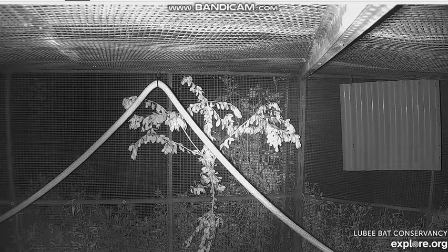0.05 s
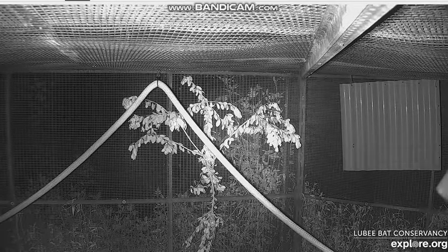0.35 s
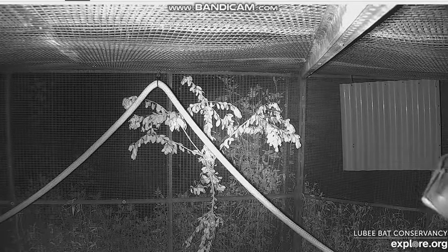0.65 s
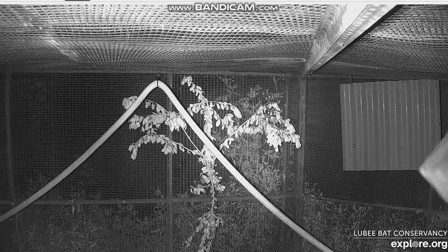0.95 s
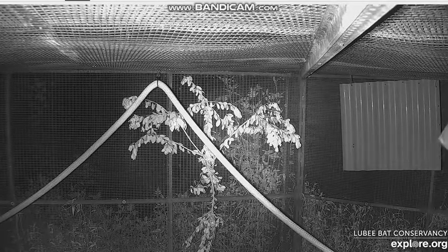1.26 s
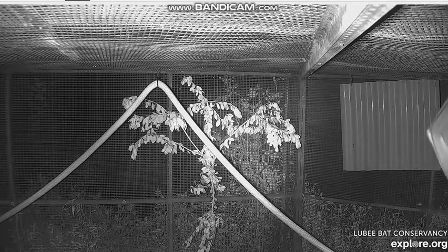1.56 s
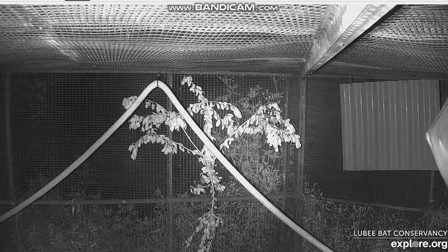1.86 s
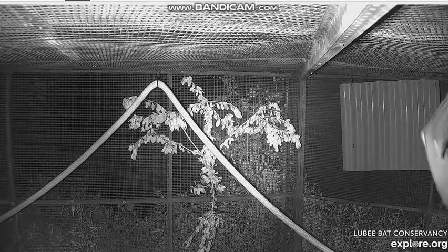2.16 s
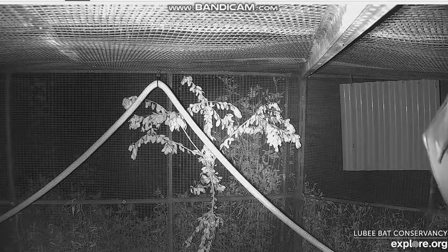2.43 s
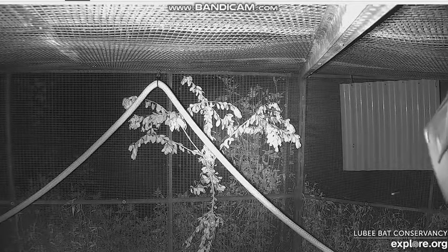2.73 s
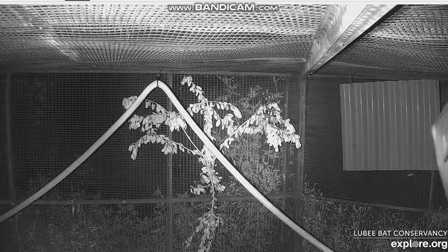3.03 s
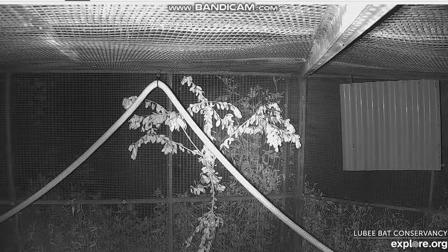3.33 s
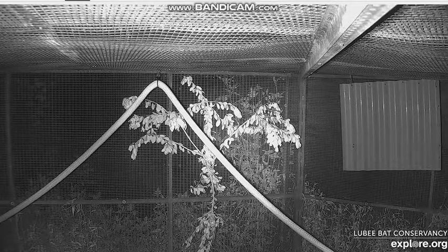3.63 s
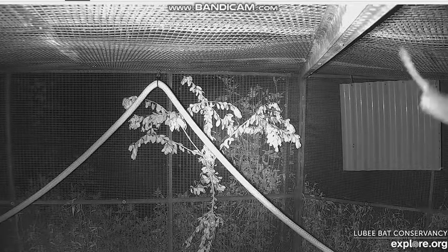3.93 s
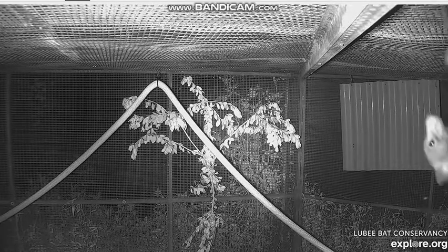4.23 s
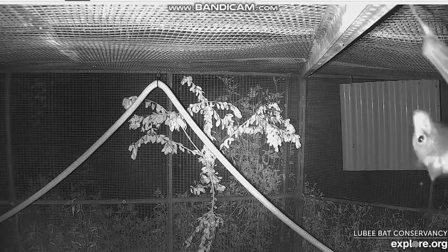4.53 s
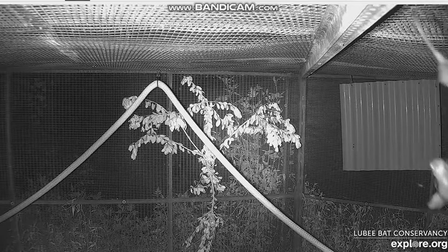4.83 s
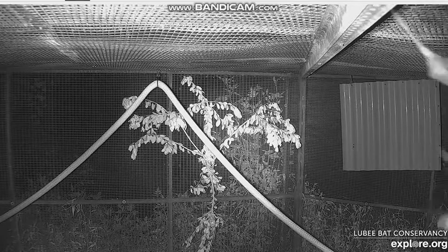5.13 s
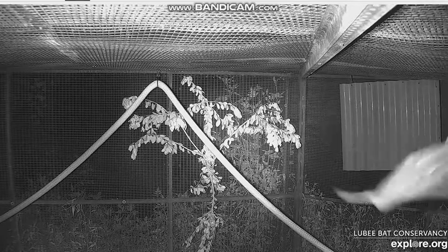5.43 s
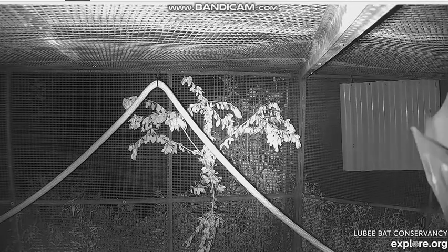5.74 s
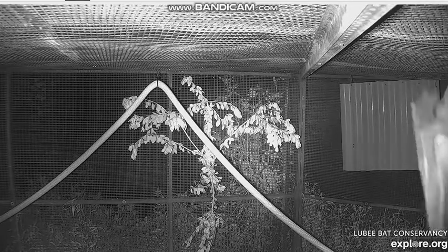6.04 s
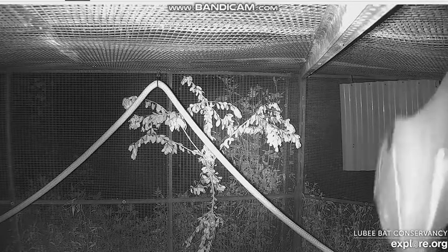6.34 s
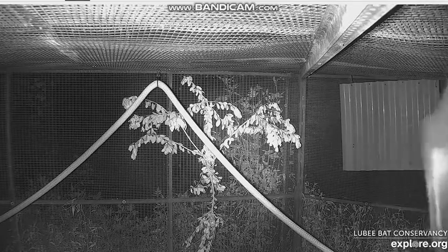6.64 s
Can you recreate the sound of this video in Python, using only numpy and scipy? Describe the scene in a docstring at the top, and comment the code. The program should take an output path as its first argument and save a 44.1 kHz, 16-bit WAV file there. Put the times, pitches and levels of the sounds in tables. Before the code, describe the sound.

Night insects make a faint, steady high hiss over a low machine hum in a roofed mesh enclosure. A fruit bat gives two squeals that run into a quick, uneven series of raspy squawks. After a pause comes one very short, harsh screech, the loudest sound. Claws and wings rustle softly on the mesh now and then, more often toward the end. The calls have a short echo.

```python
"""Fruit bat in a mesh enclosure

A fruit bat squawks a quick series of calls, then one short harsh screech. Its vocal folds slip between
clean tone, period doubling and rasp, filtered by the throat; the roofed enclosure adds a short tail.
Bats rustle faintly on the mesh, over a low machine hum and the steady high hiss of night insects."""
import sys
import numpy as np
from scipy import signal
from scipy.fft import rfft, irfft, next_fast_len
from scipy.io import wavfile
from scipy.ndimage import uniform_filter1d

SR = 44100
rng = np.random.default_rng(int(sys.argv[2]) if len(sys.argv) > 2 else 0)


def generate_wav(sig):
    """Save sig (samples, or channels by samples) to the path in sys.argv[1] as 16-bit PCM at SR."""
    pcm = np.round(np.clip(np.atleast_2d(sig).T, -1, 1) * 32767).astype(np.int16)
    wavfile.write(sys.argv[1], SR, pcm)


N = 294367
TIME = np.arange(N) / SR
BAND_LIMIT_HZ = 14000

# machine hum partials: frequency_hz, level_db
HUM_PARTIALS = [(62.5, -104), (75.5, -68.5), (93.5, -73.5), (120, -71), (125, -75), (187.5, -78),
                (240, -78.5)]
# spectral envelopes of the noise sources: frequency_hz, relative_db
RUMBLE_SPECTRUM = [(12, -50), (20, -18), (48, -34), (52, -18), (64, -9), (97, -7.5), (123, 4), (151, -2.5),
                   (315, -13), (676, -28), (900, -31), (1170, -60), (1980, -120)]
PUFF_SPECTRUM = [(350, -40), (680, 6), (900, 1), (1200, -6), (1900, -2), (3000, -32), (9000, -40)]
RUSH_SPECTRUM = [(100, -9), (280, 2), (450, -6), (800, -23), (2000, -33), (8000, -75)]
HISS_SPECTRUM = [(300, -10.5), (1000, -10), (1500, -5), (1900, -3), (4000, 0.5), (5600, -10), (7700, -10),
                 (9500, -3), (11000, -1), (12100, -4), (12500, -17), (14000, -25)]
KATYDID_SPECTRUM = [(6500, -44), (8000, -16.5), (9500, 2.5), (10900, 3.5), (11500, 0.5), (12100, -2.5),
                    (12500, -13), (14000, -34)]
SCUFF_SPECTRUM = [(600, -28), (1050, -10), (1350, -13.5), (1600, -13.5), (2500, -3.5), (3500, 4), (4300, 2),
                  (5500, -5.5), (8000, -15.5), (13000, -25)]
# soft low puffs: peak_s, level_db
PUFFS = [(1.45, -69), (1.81, -70.5), (2.14, -67.5), (3.76, -69), (5.03, -64)]
# envelope of a distant rush: time_s, level_db
RUSH_ENVELOPE = [(0, -71.5), (.5, -69.5), (1.0, -80), (1.6, -84), (2.5, -78), (6.7, -87)]
# katydid buzzes: stroke_rate_hz, level_db
KATYDIDS = [(100.2, -80), (109.6, -71.5), (114.5, -75)]
# cricket trills: centre_hz, bandwidth_hz, level_db
CRICKETS = [(6628, 310, -66), (6274, 280, -73.5)]
# claws and wings on the mesh: start_s, level_db, fade_s
SCUFFS = [(.195, -63.5, 0.044), (.3, -71.5, 0.16), (0.542, -52, 0.0028), (.68, -70, 0.054),
          (.77, -62.5, 0.044), (1.18, -62.5, 0.095), (1.33, -67, .04), (1.5, -68, 0.036),
          (3.818, -58, 0.08), (4.13, -68, 0.17), (4.66, -62.5, 0.087), (4.8, -61.5, 0.041),
          (5.11, -60, 0.059), (5.335, -67.5, 0.08), (5.47, -65, 0.1), (5.61, -64, 0.047),
          (5.794, -58.5, 0.054), (5.885, -60, .08), (5.975, -56.5, 0.053), (6.44, -65.5, 0.084),
          (6.53, -64, 0.09), (6.643, -56, .08)]
# resonances of the mesh: centre_hz, bandwidth_hz, relative_db
MESH_MODES = [(1340, 155, -18), (1790, 92, -14), (3450, 93, -22.5), (4000, 30, -12.5)]
# single ringing wires: peak_s, centre_hz, level_db, half_width_s
WIRE_RINGS = [(.42, 4000, -71.5, 0.11), (.42, 1790, -77, 0.12), (4.02, 4000, -67.5, .03),
              (5.594, 4000, -65, .02), (5.91, 3450, -64, 0.025), (6.016, 3500, -62, 0.037),
              (6.432, 1340, -74.5, 0.055)]
# reflections from roof and frame: delay_s, gain_db
EARLY_REFLECTIONS = [(.00154, -16.5), (.0032, -18), (.0056, -10), (.0084, -11.5)]
# reverberation time of the enclosure: frequency_hz, t60_s
REVERB_TIMES = [(500, 0.35), (2000, 0.35), (5000, 0.31), (12000, 0.12)]
# vocal tract responses, mouth narrow, half open and wide open: frequency_hz, relative_db
SQUAWK_TRACT = [(600, -36), (930, -35.5), (1070, -14), (1550, -12), (1850, 5.5), (2100, 4.5), (2500, -2),
                (3000, -5), (3700, -6.5), (4300, 6.5), (4750, -9.5), (5900, -6), (7000, -12.5), (9700, -25),
                (13500, -40.5)]
SQUEAL_TRACT = [(700, -57), (1100, -12), (1300, -5.5), (1650, -10.5), (1900, 6), (2200, 1), (2500, 0.5),
                (2950, -15), (3300, -2.5), (4400, 3.5), (4750, -12.5), (5900, -1), (7000, -9.5),
                (9800, -17), (13500, -43)]
SCREECH_TRACT = [(700, -50), (1000, -48), (1300, -25.5), (1600, -23), (1780, -2.5), (2180, -2.5),
                 (2350, -14), (3200, -19), (3750, -11.5), (4300, -5), (4650, -13), (5600, -1),
                 (6450, -14.5), (7400, -18.5), (10000, -24), (13000, -42)]
# the bat's calls: start_s, length_s, attack_s, pitch_hz, scoop_ratio, level_db,
# subharmonic_start_ratio, subharmonic_end_ratio, roughness_ratio, tilt_db_per_octave
SQUEALS = [(1.710, .044, .04, 1250, .02, -43, .5, .95, .52, -3),
           (1.850, .252, .007, 1252, .02, -40.2, .5, .58, .18, 3.3),
           (4.906, .022, .02, 1075, .01, -47.5, .05, .2, .12, -5.5)]
SQUAWKS = [(2.206, .066, .005, 1110, .21, -41.5, .2, .85, .33, 4),
           (2.272, .09, .003, 1130, .01, -45.3, .05, .7, .27, 4),
           (2.467, .046, .009, 1035, .12, -49.5, .35, .35, .28, 3),
           (2.624, .064, .033, 955, .02, -46.5, .6, .45, .44, .5),
           (2.791, .05, .04, 1030, .02, -39.7, .3, .55, .62, -1.5),
           (2.857, .058, .012, 1062, .02, -45.3, .05, .4, .31, -.5),
           (3.016, .198, .028, 1170, .04, -41, .5, .65, .18, -.7),
           (3.214, .063, .018, 1088, .01, -40, .12, .02, .09, 2.3),
           (3.298, .019, .014, 915, .02, -52.5, .8, .8, .5, -10),
           (3.400, .047, .008, 1040, .15, -46, .03, .15, .12, -1)]
SCREECH = (4.924, .046, .021, 1850, .24, -25.3, .15, .2, .74, -2.2)
# pushes of breath within calls: peak_s, half_width_s, pitch_rise_ratio, gain_db
BREATH_SURGES = [(1.752, .01, .1, 1), (1.882, .019, .32, 4), (1.954, .009, .12, 6), (2.006, .01, .15, 6),
                 (2.061, .02, .245, 7), (2.114, .008, .19, 3), (2.243, .013, .28, 0),
                 (2.498, .013, .05, .5), (2.686, .017, .08, .5), (3.060, .017, .15, 1),
                 (3.148, .022, .08, 1.5), (3.187, .02, .2, 3), (3.438, .013, .23, 4.5),
                 (4.938, .011, .55, 3)]


def gain_of(db):
    """Amplitude ratio of a level in decibels."""
    return 10 ** (np.asarray(db) / 20)


def unit_rms(x):
    """Normalisation to unit mean power."""
    return x / np.sqrt(np.mean(x ** 2) + 1e-20)


def value_at(table, hz):
    """Interpolation on a logarithmic frequency axis."""
    table_hz, values = np.transpose(table)
    return np.interp(np.log(hz + 1), np.log(table_hz + 1), values)


def add(mix, start_s, sound):
    """Superposition of a sound on the mix, from start_s."""
    part = mix[round(start_s * SR):][:len(sound)]
    part += sound[:len(part)]


def shaped(x, spectrum):
    """Linear filtering by a spectral envelope, scaled to rms 1."""
    size = next_fast_len(len(x) + 1024)
    response = gain_of(value_at(spectrum, np.fft.rfftfreq(size, 1 / SR)))
    return unit_rms(irfft(rfft(x, size) * response, size)[:len(x)])


def tilted(x, db_per_octave):
    """Time-varying spectral tilt, through five overlapping octave bands around 3 kHz."""
    octaves = np.log2((np.fft.rfftfreq(2 * len(x), 1 / SR) + 1) / 3000).clip(-2, 2)
    spectrum = rfft(x, 2 * len(x))
    bands = {k: irfft(spectrum * np.maximum(1 - abs(octaves - k), 0))[:len(x)] for k in range(-2, 3)}
    return sum(gain_of(db_per_octave * k) * band for k, band in bands.items())


def wander(size, rate_hz):
    """Random modulation: Gaussian noise low-passed near rate_hz, with rms about 1."""
    step = 16
    points = next_fast_len(size // step + 512)
    low_pass = np.exp(-.5 * (np.fft.rfftfreq(points, step / SR) / rate_hz) ** 2)
    slow = unit_rms(irfft(rfft(rng.standard_normal(points)) * low_pass, points))
    return np.interp(np.arange(size) / step, np.arange(points), slow)


def resonance(hz, bandwidth_hz):
    """A noise-driven resonance: a carrier of slowly varying random amplitude and phase."""
    envelope = wander(N, bandwidth_hz / 2) + 1j * wander(N, bandwidth_hz / 2)
    return (envelope * np.exp(2j * np.pi * hz * TIME)).real


def machinery(rumble_db=-65.5, waver_depth=.11, waver_hz=1.1):
    """Machine hum: amplitude-modulated partials over a continuous low noise spectrum."""
    hum = np.zeros(N)
    for hz, db in HUM_PARTIALS:
        partial = np.sqrt(2) * np.cos(2 * np.pi * (hz * TIME + rng.random()))
        hum += gain_of(db) * partial * (1 + waver_depth * wander(N, waver_hz))
    return hum + gain_of(rumble_db) * shaped(rng.standard_normal(N), RUMBLE_SPECTRUM)


def low_air(puff_width_s=.016):
    """Filtered noise under envelopes: soft low puffs, and a distant rush that dies away."""
    envelope = sum(gain_of(db) * np.exp(-((TIME - s) / puff_width_s) ** 2 / 2) for s, db in PUFFS)
    puffs = envelope * shaped(rng.standard_normal(N), PUFF_SPECTRUM)
    rush_db = np.interp(TIME, *np.transpose(RUSH_ENVELOPE))
    return puffs + gain_of(rush_db) * shaped(rng.standard_normal(N), RUSH_SPECTRUM)


def hiss(level_db=-66, flicker_db=1.94, dip_s=4.352, dip_width_s=.021, dip_db=-12):
    """Broadband noise whose level flickers slightly and dips once, briefly."""
    dip = np.exp(-((TIME - dip_s) / dip_width_s) ** 4)
    envelope_db = level_db + flicker_db * wander(N, rate_hz=6.1) + dip_db * dip
    return gain_of(envelope_db) * shaped(rng.standard_normal(N), HISS_SPECTRUM)


def insects(stroke_decay_s=.0014, rate_drift=.0052, cricket_stroke_hz=45.5):
    """Stridulation: katydids rasp once per wing stroke; crickets sound on both closing and opening."""
    katydids = np.zeros(N)
    for stroke_hz, db in KATYDIDS:
        strokes = np.cumsum(stroke_hz * (1 + rate_drift * wander(N, rate_hz=2.2))) / SR + rng.random()
        age = strokes % 1 / stroke_hz
        rasps = rng.standard_normal(N) * np.exp(-age / stroke_decay_s)
        katydids += gain_of(db) * shaped(rasps, KATYDID_SPECTRUM)
    wing_phase = 2 * np.pi * np.cumsum(cricket_stroke_hz * (1 + rate_drift * wander(N, rate_hz=3.8))) / SR
    trill = unit_rms(np.exp(.11 * np.cos(wing_phase) + .16 * np.cos(2 * wing_phase)))
    return katydids + trill * sum(gain_of(db) * resonance(hz, width) for hz, width, db in CRICKETS)


def wires(bandwidth_hz=150):
    """Frictional excitation: single wires resonate briefly as a claw drags over them."""
    return sum(gain_of(db) * np.exp(-((TIME - s) / width_s) ** 2 / 2) * resonance(hz, bandwidth_hz)
               for s, hz, db, width_s in WIRE_RINGS)


def scuffs(rise_s=.0027, grain_depth=.1, grain_hz=150):
    """Friction noise of claws and wings, with the modes of the mesh; overlapping scuffs add in power."""
    power = np.zeros(N)
    age = np.arange(SR) / SR
    for start_s, db, fade_s in SCUFFS:
        envelope = gain_of(db) * np.minimum(age / rise_s, 1) * np.exp(-(age / fade_s) ** 2 / 2)
        add(power, start_s, envelope ** 2)
    swish = shaped(rng.standard_normal(N) * np.exp(grain_depth * wander(N, grain_hz)), SCUFF_SPECTRUM)
    ring = sum(gain_of(db) * resonance(hz, width) for hz, width, db in MESH_MODES)
    return np.sqrt(power) * unit_rms(swish + ring)


def far_echo(x, delay_s=.46, echo_db=-42, cutoff_hz=2800):
    """A distant reflection returns late, attenuated and low-passed."""
    echo = np.zeros(N)
    low_pass = signal.butter(2, cutoff_hz, fs=SR, output="sos")
    add(echo, delay_s, gain_of(echo_db) * signal.sosfilt(low_pass, x))
    return echo


def enclosure(x, tail_db=-13, scatter_db=-9, scatter_t60_s=.17, gap_s=.006, arrivals_per_s=3000):
    """Convolution with an impulse response: direct sound, early reflections, mesh scatter and tail."""
    t = np.arange(SR) / SR
    arrivals = rng.standard_normal((2, SR)) * (rng.random((2, SR)) < arrivals_per_s / SR)
    tail_taps, scatter_taps = arrivals * (t > gap_s)
    hz, age, spectra = signal.stft(tail_taps, SR, nperseg=256)
    decay = gain_of(-60 * age / value_at(REVERB_TIMES, hz)[:, None])
    tail = signal.istft(spectra * decay, SR, nperseg=256)[1][:SR]
    scatter = scatter_taps * gain_of(-60 * t / scatter_t60_s)
    response = gain_of(tail_db) * tail / np.linalg.norm(tail)
    response += gain_of(scatter_db) * scatter / np.linalg.norm(scatter)
    response[0] += 1  # direct sound
    for delay_s, db in EARLY_REFLECTIONS:
        add(response, delay_s, gain_of([db]))
    return signal.fftconvolve(x, response / np.linalg.norm(response))[:N]


def gesture(call, surges, onset_db, onset_tilt, release_db_per_s,
            scoop_s=.015, sag_hz_per_s=200, jaw_s=.013):
    """Breath control: a surge makes the voice higher, louder and purer; its fall breaks it into rasp."""
    start_s, length_s, attack_s, pitch_hz, scoop, level_db, sub_start, sub_end, roughness, tilt = call
    age = np.arange(0, length_s + 30 / release_db_per_s, 1 / SR)  # until the release has fallen 30 dB
    t = start_s + age
    progress = np.minimum(age / length_s, 1)
    surge, surge_db = np.zeros((2, len(t)))
    for peak_s, width_s, rise, db in surges:
        push = np.exp(-((t - peak_s) / width_s) ** 2)
        surge += rise * push
        surge_db += db * push
    breaking = np.clip(-np.gradient(surge, t) / 12, 0, 1)  # a fall of 12 per second breaks it fully
    # the pitch scoops up, then sinks as the breath runs out
    hz = (pitch_hz - sag_hz_per_s * age) * (1 - scoop * np.exp(-(age / scoop_s) ** 2)) * (1 + surge)
    attack_db = onset_db * np.maximum(1 - age / attack_s, 0)
    release_db = release_db_per_s * np.maximum(age - length_s, 0)
    effort_db = level_db + attack_db - release_db + surge_db - 2.5 * breaking
    subharmonics = (sub_start + (sub_end - sub_start) * progress) * np.exp(-surge_db / 3)
    roughness = roughness * (1 + .7 * (progress - .5)) + .35 * breaking  # strain builds through the call
    mouth_tilt = onset_tilt * np.exp(-(age / jaw_s) ** 2) + 2.5 * (progress - .5)  # the mouth opens
    tilt = tilt + mouth_tilt - 7 * surge + 5 * breaking  # dB per octave: surges dull, breaks brighten
    return t, hz, effort_db, subharmonics, np.clip(roughness, 0, 1), tilt


def voice(controls, tract, air=.3, jitter=.042, jitter_hz=260, rasp=.4, rasp_hz=220, odd_db=-4):
    """Source-filter voicing: uneven vocal-fold cycles and pulsed turbulence excite the tract's formants."""
    t, hz, effort_db, subharmonics, roughness, tilt = controls
    size = len(t)
    waver = .012 * np.sqrt(roughness) * wander(size, rate_hz=55)
    cycle_jitter = jitter * roughness ** .69 * wander(size, jitter_hz)
    cycles = np.cumsum(hz * (1 + waver + cycle_jitter)) / SR
    # period doubling: alternate strong and weak cycles put lines halfway between the harmonics
    order = np.arange(2, 27)[:, None] / 2
    amplitude = np.where(order % 1, subharmonics, 1) * (order * hz < BAND_LIMIT_HZ)
    # even harmonics lead, and the overtones shimmer as the pulse shape changes
    shimmer_db = 4.8 * np.array([wander(size, rate_hz=32) for _ in order]) * np.minimum(order / 4, 1)
    amplitude *= gain_of(odd_db * (order % 2 == 1) * (order > 1) + shimmer_db)
    lag = rng.random((len(order), 1))  # the throat delays each harmonic differently
    folds = shaped((amplitude * np.cos(2 * np.pi * (order * cycles + lag))).sum(0), tract)
    turbulence = shaped(rng.standard_normal(size) * (1 + np.cos(2 * np.pi * cycles)), tract)
    sound = tilted((1 - roughness) * folds + air * roughness * turbulence, tilt)
    sound /= np.sqrt(abs(uniform_filter1d(sound ** 2, size=300)) + 1e-9)  # unit short-time power
    # chaotic folds beat in bursts
    flutter = unit_rms(np.exp(rasp * roughness * np.tanh(wander(size, rasp_hz))))
    fade = np.clip(np.minimum(t - t[0], t[-1] - t) / .002, 0, 1)
    return t[0], gain_of(effort_db) * sound * flutter * fade


def bat():
    """Nonlinear phonation: two squeals, a run of squawks, then a thin rising note and the screech."""
    out = np.zeros(N)
    for calls, tract in (SQUEALS, SQUEAL_TRACT), (SQUAWKS, SQUAWK_TRACT):
        for call in calls:
            controls = gesture(call, BREATH_SURGES, onset_db=-15, onset_tilt=-6, release_db_per_s=1100)
            add(out, *voice(controls, tract))
    controls = gesture(SCREECH, [], onset_db=-23, onset_tilt=9, release_db_per_s=1050)
    add(out, *voice(controls, SCREECH_TRACT, air=1.2, jitter=.118, jitter_hz=310,
                    rasp=.31, rasp_hz=286, odd_db=-6))
    return out


def scene():
    """Superposition of the reverberant calls, their echo and the sounds of the night, in mono."""
    calls = enclosure(bat())
    return (calls + far_echo(calls) + scuffs() + wires() + low_air()
            + machinery() + hiss() + insects())[None]


def record(dry):
    """Band limiting by a linear-phase low-pass filter."""
    low_pass = signal.firwin(511, BAND_LIMIT_HZ, window=("kaiser", 9), fs=SR)
    return signal.oaconvolve(dry, low_pass[None], "same")


dry = scene()
out = record(dry)
generate_wav(out)
```